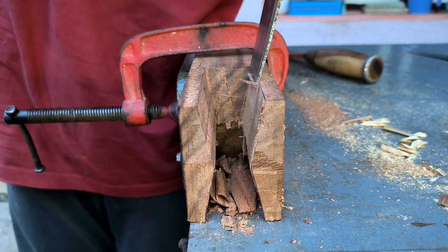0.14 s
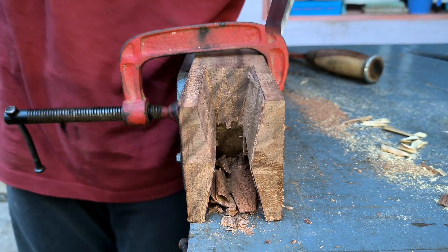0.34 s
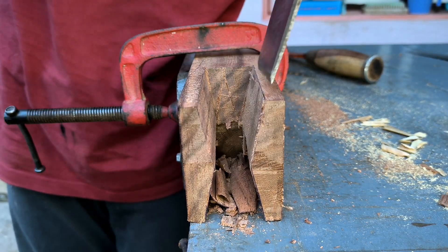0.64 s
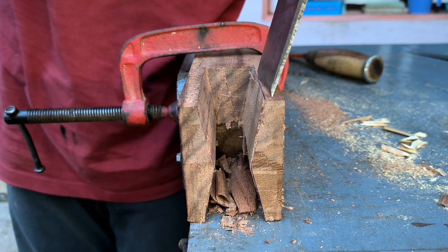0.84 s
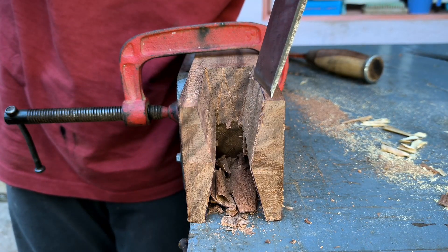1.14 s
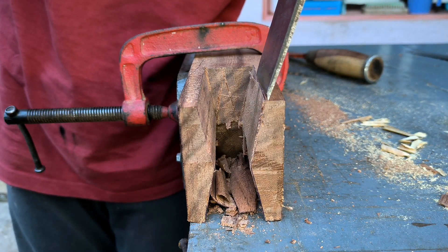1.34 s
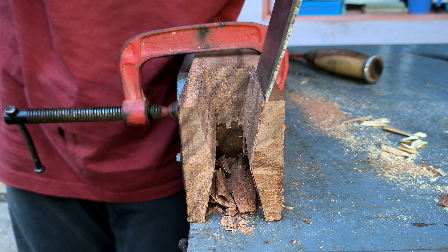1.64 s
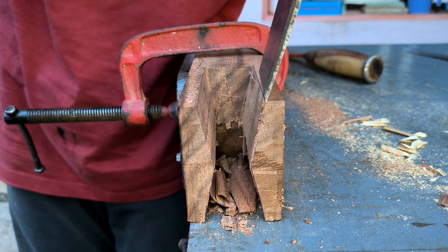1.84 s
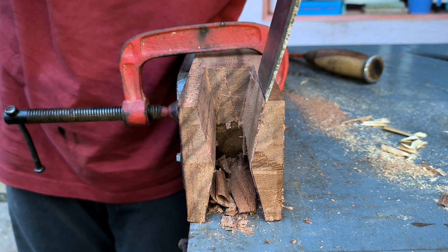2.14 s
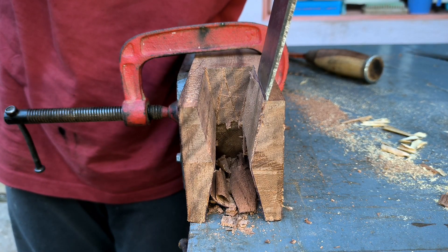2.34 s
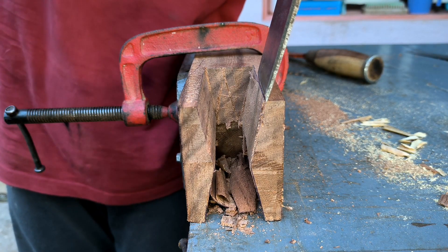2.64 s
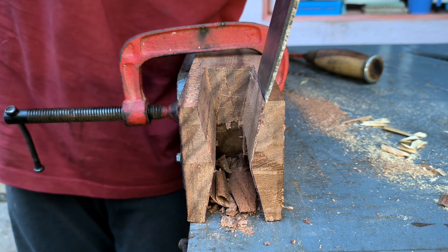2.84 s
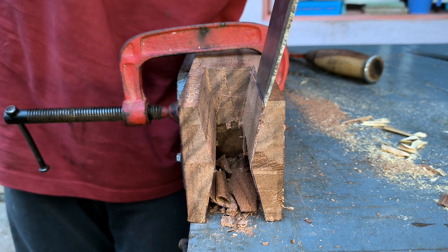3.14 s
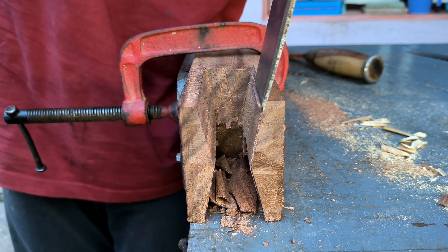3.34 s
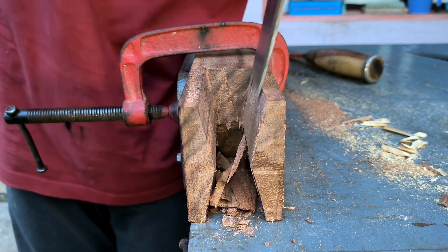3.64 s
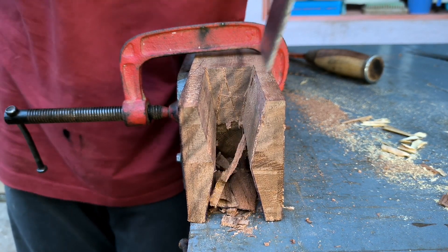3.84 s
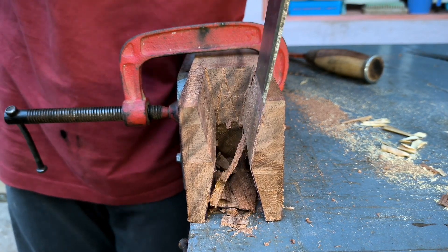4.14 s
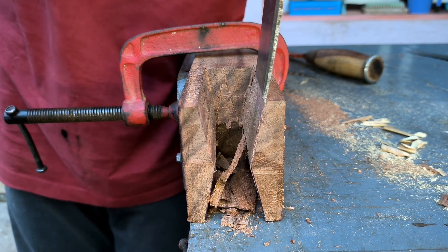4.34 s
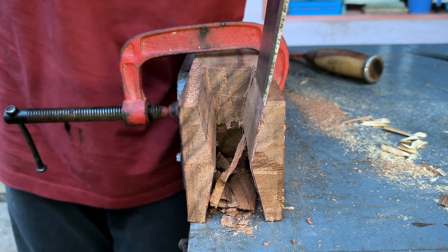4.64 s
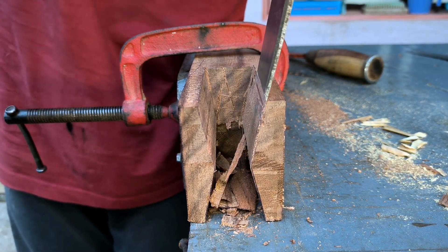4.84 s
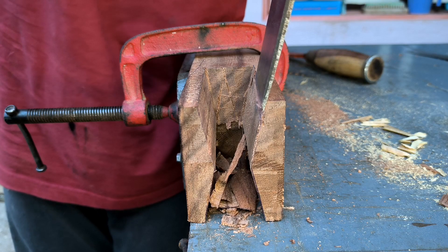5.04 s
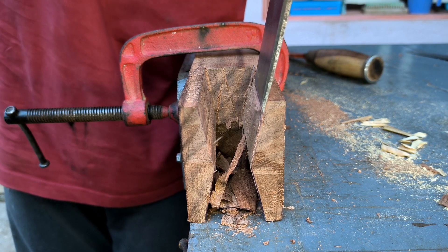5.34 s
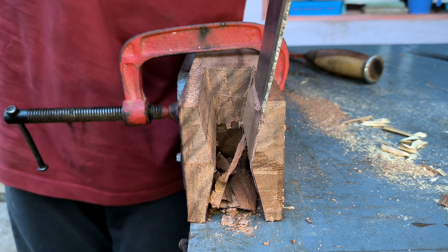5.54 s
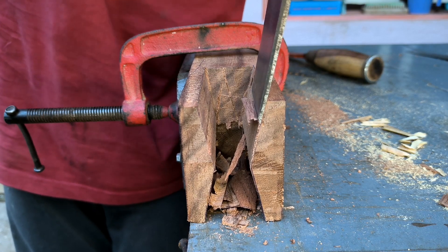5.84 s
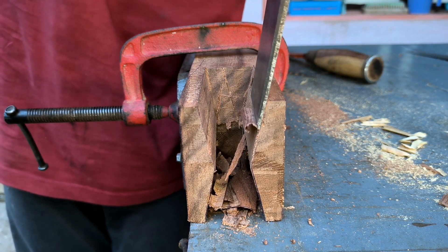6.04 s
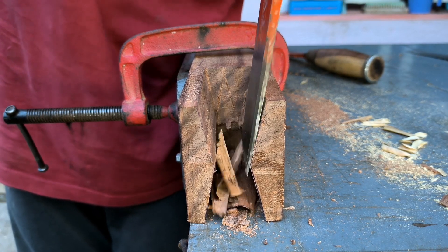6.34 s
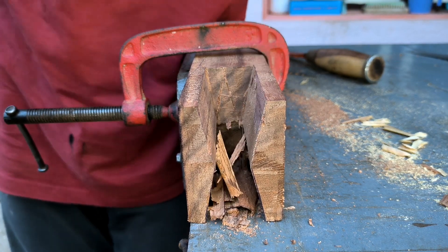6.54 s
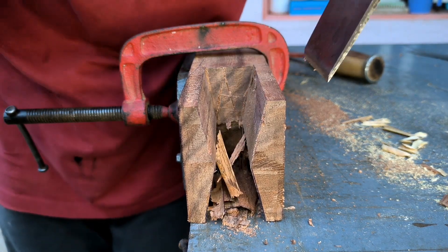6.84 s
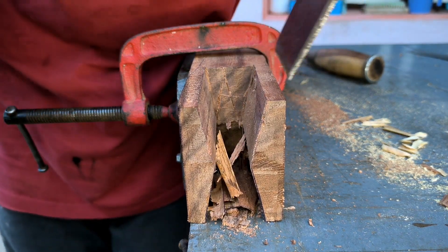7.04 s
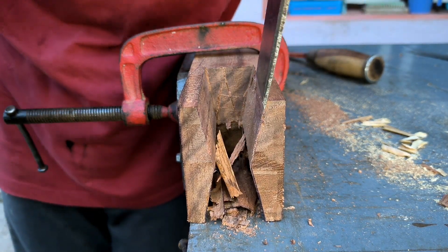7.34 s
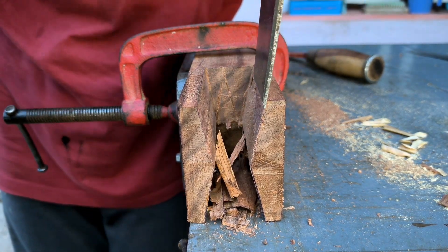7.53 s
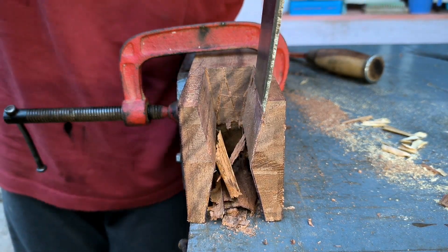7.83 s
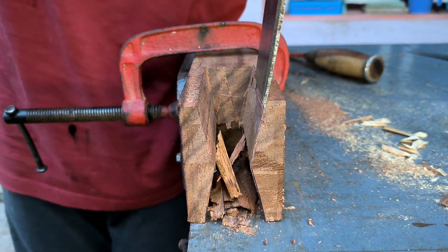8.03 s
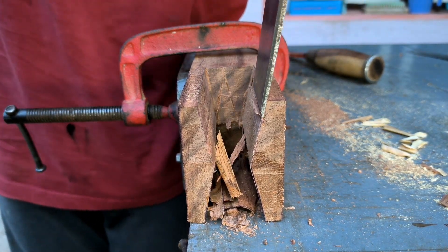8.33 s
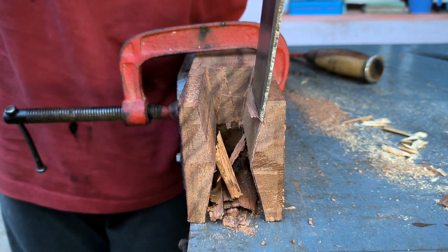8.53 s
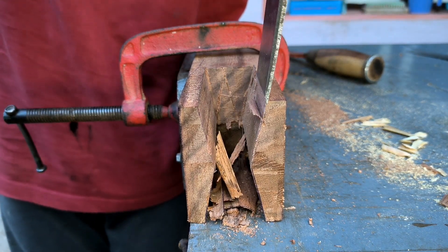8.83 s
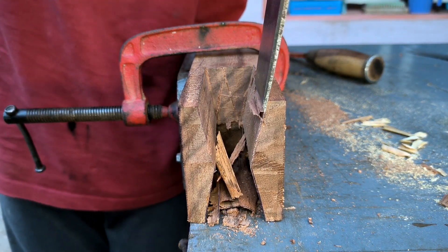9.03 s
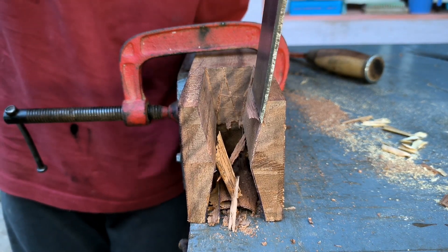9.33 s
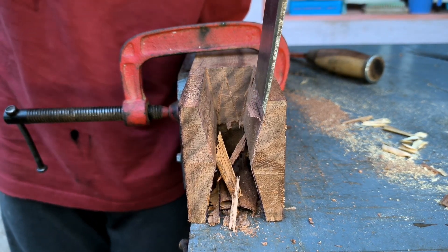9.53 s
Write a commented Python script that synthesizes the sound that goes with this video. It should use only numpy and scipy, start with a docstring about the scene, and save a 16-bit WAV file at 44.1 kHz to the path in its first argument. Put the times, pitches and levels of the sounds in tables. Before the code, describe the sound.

A chisel scrapes softly into wood with a grainy hiss and small dry snaps during the first second, then shifts faintly, with another scrape at about 2 seconds. From 2.8 to 3.6 seconds a mallet strikes it four times in short, dry knocks. Each blow carries a crack of fibres, a dull workbench thud and the rattle and ring of a clamp's loose steel bar. A lighter tap comes at 4 seconds and two firm knocks at 4.5 and 4.8, then the blade groans briefly against the wood around 5. Five even knocks follow from 5.4 to 6.3 seconds. A splinter snaps at 6.5, and a lull holds a light tap and faint ticks. Five more knocks fall between 7.9 and 9.2 seconds, mixed with scraping and splintering. Everything sounds close, with quick reflections over quiet, steady air.

```python
"""A chisel scrapes and snaps through wood, then a mallet drives it in with runs of short, dry knocks.
Under each blow the fibres crack, the workbench thuds, and the loose steel bar of the clamp that holds
the block rattles and rings. Between blows the blade pares with a grainy hiss, prises splinters free
and now and then groans against the wall of the cut. Quick reflections and quiet air surround the work."""
import sys
import numpy as np
from scipy import signal
from scipy.fft import rfft, irfft, next_fast_len
from scipy.io import wavfile

SR = 44100
rng = np.random.default_rng(int(sys.argv[2]) if len(sys.argv) > 2 else 0)


def dump(signal):
    """Clip the signal to [-1, 1] and save it as 16-bit WAV at the path in sys.argv[1]."""
    limited = np.clip(np.atleast_2d(signal).T, -1, 1)
    pcm = np.round(limited * 32767).astype(np.int16)
    wavfile.write(sys.argv[1], SR, pcm)


N = 426888
CUTOFF_HZ = 15900
LENGTH = SR // 3   # samples in a one-shot
AGE = np.arange(LENGTH) / SR   # seconds into a one-shot

# blows and taps on the chisel: t/s, knock/dB, brightness/(dB per octave), thud/dB, rattle/dB, rattle hold/s
BLOWS = [(0.898, -70, 29, -57.5, -69, 0.022), (2.8483, -27, -4, -33, -39.5, 0.059),
         (3.1057, -27.5, -3.5, -31.5, -39, 0.059), (3.3387, -27.5, 2.5, -35, -39, 0.063),
         (3.561, -29.5, 4.5, -35, -39, 0.05), (4.0495, -41.5, -7, -42, -46, 0.039),
         (4.5346, -28, 3.5, -42, -39.5, 0.04), (4.7805, -27.5, 4, -39, -39.5, 0.038),
         (5.1524, -54, 10, -41.5, -51, 0.029), (5.266, -78, 30, -66, -72, 0.0091),
         (5.4428, -31, 1, -34.5, -36.5, .055), (5.6835, -27, 0.5, -38, -42, 0.056),
         (5.9093, -27.5, 2.5, -38, -40, 0.034), (6.1254, -29, 8.5, -35.5, -46, 0.054),
         (6.3416, -28, 7, -35, -39.5, 0.052), (6.535, -53.5, 21, -63, -55, 0.017),
         (7.281, -48.5, -8, -50, -61.5, 0.0055), (7.416, -81, 2, -65.5, -91, 0.016),
         (7.918, -32.5, 3.5, -39.5, -44, 0.037), (8.2775, -72.5, 3, -42, -54.5, 0.026),
         (8.3311, -28.5, -10.5, -38.5, -42, 0.033), (8.5559, -26.5, 7, -35, -40.5, 0.045),
         (8.9762, -28, -0.5, -37.5, -39.5, 0.049), (9.1891, -29, -3.5, -34.5, -33.5, 0.038)]
# hard landings of the loose bar: t/s, level/dB
CLINKS = [(2.8983, -41), (2.932, -49.5), (3.1582, -42.5), (3.383, -38), (4.0627, -40), (4.088, -44),
          (4.564, -42.5), (5.176, -46), (5.735, -38.5), (6.1651, -37), (6.394, -49), (7.938, -44.5),
          (7.9629, -39.5), (8.375, -42.5), (8.993, -38), (9.0181, -42)]
# modes of the block and bench top: f/Hz, level/dB, t60/s, left over right/dB
BENCH_MODES = [(150.1, -20, 0.17, -4), (219, -8, .11, -1), (261.3, -3, 0.083, -4.5), (316, 2.5, 0.084, 0.5),
               (381.7, -5, 0.15, 0), (405, -2.5, 0.066, -6.5), (526, 4.5, 0.059, -10.5),
               (547, 0, 0.14, -4.5), (635.5, -3.5, 0.055, 0.5), (780, -10.5, 0.017, 0.5)]
# modes of the clamp's steel, and the bar's shrill ring: f/Hz, level/dB, t60/s, left over right/dB
STEEL_MODES = [(1243, -8, .08, -1), (1650, -3, .04, 3), (5160, -20, .018, -3), (6405, -18, .05, 0),
               (8315, -2, .035, -3), (8698, -15, .03, -7), (9898, -23, .05, -3), (10665, -20, .04, -4)]
SHRILL_MODES = [(13435, 0, .05, 2), (13520, -6, .018, 0), (13095, -14, .025, 0), (15330, -14, .018, -2)]
# tone of cracking fibres, the rattling bar and the hissing blade: f/Hz, level/dB
CRACK_EQ = [(20, -12), (100, -19.5), (300, 4), (900, 7), (2500, 8), (3500, 0), (6000, -8), (8500, -5),
            (12000, -10.5), (14000, -1), (15500, -1), (16500, -2.5)]
RATTLE_EQ = [(100, -22), (230, 7.5), (600, 8), (850, 1.5), (1600, 9.5), (2500, -1), (3400, -6.5), (5300, 1),
             (7300, -14), (8600, 5), (12000, -10.5), (13500, 5), (15400, -2.5), (16200, -24.5)]
HISS_EQ = [(1200, -24), (3000, -3), (4500, -4.5), (7000, -3.5), (10500, -4), (12000, -1), (13600, 2),
           (15300, 4), (16000, -20.5)]


def blows(tick_lead_s=0.0125, tick_db=-28, crack_db=-6):
    """Each blow layers a knock, a faint tick just ahead of it, a crack, a thud and the clamp's rattle."""
    out = np.zeros((2, N))
    for s, knock_db, bright_db, thud_db, rattle_db, hold_s in BLOWS:
        add(out, s, amp(knock_db) * knock(bright_db))
        add(out, s - tick_lead_s, amp(knock_db + tick_db) * knock(bright_db))
        add(out, s, amp(knock_db + crack_db) * fibre_crack())
        add(out, s, amp(thud_db) * bench_thud())
        add(out, s, amp(rattle_db) * clamp_rattle(s, hold_s, rattle_db))
    return out


def knock(bright_db, rebound=0.99, rebound_s=0.001867, contact_s=0.00056):
    """The mallet meets the handle; the chisel springs back against it an instant later."""
    # mallet and chisel handle: f/Hz, level/dB, t60/s, left over right/dB
    handle_modes = [(657.5, -11.5, 0.035, 1), (1175, -6.5, 0.036, 0.5), (1504, -3, 0.024, 7.5),
                    (1684, -0.5, 0.013, 1), (2121, 2.5, 0.013, -3), (2354, -6.5, 0.016, 0.5),
                    (2880, -14.5, 0.02, 0), (3770, -34, 0.0017, -8)]
    first = struck(handle_modes, detune=0.054, scatter_db=0, phase_spread=0.95, tilt_db=bright_db)
    again = struck(handle_modes, detune=0.025, scatter_db=2.5, phase_spread=0.32, tilt_db=bright_db)
    attack = 1 - np.exp(-AGE / contact_s)
    lag = int(rebound_s * rng.uniform(0.8, 1.211) * SR)
    return burst_one(first * attack + rebound * delayed(again * attack, lag))


def fibre_crack(bite_s=0.0017, decay_s=0.0035):
    """The edge bites and the fibres part in one short burst of noise."""
    attack = 1 - np.exp(-(AGE / bite_s) ** 2)
    return burst_one(colour(noise_burst(decay_s) * attack, CRACK_EQ))


def bench_thud(thump_db=-4.5, thump_s=0.014, give_s=0.0016):
    """The block is driven into the bench top: a dull thump and a few low modes."""
    # tone of the thump: f/Hz, level/dB
    thump_eq = [(20, -24), (100, -17.5), (180, -3.5), (230, 7), (320, 5), (600, -1), (1000, 4.5),
                (2500, -28)]
    attack = 1 - np.exp(-AGE / give_s)
    body = struck(BENCH_MODES, detune=0.018, scatter_db=1.5, phase_spread=0.13) * attack
    thump = colour(pan(-2.5) * rng.standard_normal(LENGTH) * np.exp(-AGE / thump_s), thump_eq)
    return burst_one(burst_one(body) + amp(thump_db) * burst_one(thump))


def clamp_rattle(start_s, hold_s, rattle_db, rough_db=2.5, ring_db=-1, wake_db=-38.5, bloom_s=0.035):
    """The bar's chatter is heard as a rough buzz and sets the steel ringing."""
    buzz = chatter(start_s, hold_s)
    rough = pan(-1.2) * burst_one(uneven_colour(colour(buzz, RATTLE_EQ)))
    ringing = steel(buzz, STEEL_MODES)
    # the shrill ring blooms late, and only a hard rattle wakes it fully
    bloom = 1 - np.exp(-(AGE / bloom_s) ** 2)
    shrill = steel(buzz * bloom, SHRILL_MODES)
    shrill_db = 0.5 + 0.39 * min(rattle_db - wake_db, 0)
    return amp(rough_db) * rough + amp(ring_db) * ringing + amp(shrill_db) * shrill


def chatter(start_s, hold_s, build_s=0.019, settle_s=0.0097, airborne_db=-5.5):
    """The loose bar is shaken up, buzzes against the screw and settles; it is quieter while airborne."""
    shake = np.interp(AGE, [0, build_s], [0.52, 1]) * np.exp(-np.maximum(AGE - hold_s, 0) / settle_s)
    landing_s, landing_db = np.transpose(CLINKS)[:, :, None]
    flight_s = 0.012 * amp(landing_db + 39)   # the harder the landing, the longer the flight before it
    to_landing = landing_s - start_s - AGE
    airborne = ((to_landing > 0) & (to_landing < flight_s)).any(axis=0)
    buzz = grains(LENGTH, per_s=540, spread_db=1, decay_s=0.002)
    return shake * amp(airborne_db * airborne) * speckle(buzz, spread_db=3.5, per_s=80, bands=22)


def steel(drive, modes, scatter_db=12.5):
    """Contacts ring the steel's modes, each with a share that changes from blow to blow."""
    shares = amp(scatter_db * rng.standard_normal(len(modes)))
    return burst_one(sum(share * amp(db) * pan(side_db) * rms_one(ring(drive, hz, t60))
                         for share, (hz, db, t60, side_db) in zip(shares, modes)))


def uneven_colour(x, depth=0.65, delay_s=0.0007):
    """Two short random delays give each rattle of the bar its own uneven, metallic colour."""
    for stretch in (1, np.e):
        lag = int(rng.uniform(0.5, 1.5) * stretch * delay_s * SR)
        x = x + depth * delayed(x, lag)
    return x


def clinks(click_db=-3, ring_db=-7.5, shrill_db=-1):
    """The bar lands hard: a bright click and the steel's ring."""
    out = np.zeros((2, N))
    for s, db in CLINKS:
        click = noise_burst(decay_s=0.0024)
        ringing = amp(ring_db) * steel(click, STEEL_MODES) + amp(shrill_db) * steel(click, SHRILL_MODES)
        add(out, s, amp(db) * (amp(click_db) * burst_one(colour(click, RATTLE_EQ)) + ringing))
    return out


def paring(hiss_db=-2, smoothness=1.2):
    """Fibres part under the edge as dense grains over a smooth sliding hiss."""
    # tone of the woody rasp: f/Hz, level/dB
    rasp_eq = [(40, -33.5), (120, -15), (300, -7.5), (650, 1.5), (1000, -6), (1600, -1), (2600, -0.5),
               (4500, -6), (9000, -22)]
    hiss_gain, rasp_gain = blade_pressure()
    fibres = rms_one(grains(N, per_s=440, spread_db=2, decay_s=0.0013))
    scrape = speckle(fibres + smoothness * stereo_noise(N), spread_db=3, per_s=45, bands=26)
    hiss = amp(hiss_db) * hiss_gain * pan(-1.5) * rms_one(colour(scrape, HISS_EQ))
    rasp = rasp_gain * rms_one(colour(scrape, rasp_eq))
    return hiss + rasp


def blade_pressure(attack_s=0.016, release_s=0.043, slide_db=-18, slide_rasp_db=-5.5):
    """Envelopes of hiss and rasp: pushes by hand, a dying slide after each blow, a light touch between."""
    # pushes of the blade through the fibres: t/s, level/dB, hold/s, rasp offset/dB
    pushes = [(0.082, -42, 0.018, -5), (0.217, -54.5, .03, -13), (0.35, -62.5, .14, -11),
              (0.513, -55.5, .28, -6), (0.57, -52, .01, -0.5), (0.616, -43.5, .02, -17),
              (0.822, -45, .005, -8), (0.902, -52.5, .025, -8.5), (0.957, -65.5, .24, -6.5),
              (1.224, -61.5, .015, -8), (2.022, -48.5, 0.037, -8.5), (2.096, -58.5, .09, -4.5),
              (2.723, -43, .01, -4.5), (3.236, -54.5, .07, -15.5), (3.45, -50, .03, -7),
              (3.633, -52.5, .01, -4.5), (3.709, -56, .07, -8), (4.476, -60, .04, -3),
              (4.629, -51.5, .005, -10), (4.728, -54, .02, -14), (4.873, -49, .06, -7),
              (5.01, -52, 0.12, -12), (5.312, -60, .08, -19.5), (5.772, -49, .005, -8.5),
              (5.975, -55.5, .02, -4.5), (6.082, -54, .03, 2), (6.261, -56.5, .005, -5),
              (6.463, -56, .08, -2), (6.706, -61.5, .02, -22), (7.668, -65.5, .005, -18),
              (8.182, -70.5, .02, -9), (8.256, -57, .04, -1), (8.7, -52, .03, -2),
              (8.762, -52.5, 0.0048, -25), (8.801, -49, .01, -10), (8.853, -59, 0.023, -16),
              (9.263, -52.5, .025, -18), (9.52, -63.5, .012, -5)]
    slides = [(s, knock_db + slide_db, 0, slide_rasp_db) for s, knock_db, *_ in BLOWS]
    power = amp([[-75], [-78]]) ** 2 * np.ones(N)   # hiss and rasp of the lightly shifting blade
    age = np.arange(SR) / SR
    attack = np.minimum(age / attack_s, 1) ** 2
    for s, db, hold_s, rasp_db in [*pushes, *slides]:
        release = np.exp(-np.maximum(age - attack_s - hold_s, 0) / release_s)
        add(power, s, (amp([[db], [db + rasp_db]]) * attack * release) ** 2)
    return np.sqrt(power)


def splinters(snap_s=0.003, crack_s=0.0015, crack_db=-8.5, body_db=-4.5):
    """A splinter lets go with a dry snap and a little woody knock that sets the block ringing."""
    # splinters cracking and shifting: t/s, snap/dB, woody knock/dB
    breaks = [(.099, -51.5, -58), (.129, -53, -56.5), (.586, -52, -72), (.6345, -55.5, -74),
              (.846, -50.5, -67), (1.245, -68.5, -94), (2.738, -62, -76), (3.2486, -64.5, -79),
              (3.785, -76, -78.5), (4.02, -72.5, -87), (4.948, -61.5, -73), (6.552, -51, -54.5),
              (6.9, -78.5, -91), (7.02, -73, -89.5), (7.288, -67, -58), (7.48, -78, -90.5),
              (7.633, -75, -70.5), (8.303, -66, -51), (8.745, -58, -56.5), (8.7785, -64, -86),
              (8.83, -65, -65), (9.555, -70.5, -71)]
    out = np.zeros((2, N))
    attack = 1 - np.exp(-AGE / snap_s)
    for s, snap_db, woody_db in breaks:
        snap = colour(noise_burst(snap_s), HISS_EQ)
        crack = colour(noise_burst(crack_s), CRACK_EQ)
        body = struck(BENCH_MODES, detune=0.035, scatter_db=5, phase_spread=0.2) * attack
        add(out, s, amp(snap_db) * (burst_one(snap) + amp(crack_db) * burst_one(crack)))
        add(out, s, amp(woody_db) * (knock(bright_db=0) + amp(body_db) * burst_one(body)))
    return out


def groans():
    """The blade sticks and slips on the wall of the cut, which hums briefly."""
    # rubs of the blade: peak t/s, level/dB, rise and fall time/s
    rubs = [(.13, -64, 0.014), (2.126, -85, 0.017), (2.189, -60, .015), (4.397, -62, 0.016),
            (4.484, -59, 0.02), (4.898, -68, 0.013), (4.953, -45.5, 0.012), (5.037, -55.5, 0.033),
            (5.109, -57, 0.075), (8.304, -47, 0.0026), (8.747, -57.5, 0.023)]
    # wall of the cut, damped by the blade: f/Hz, level/dB, t60/s
    wall_modes = [(615, -6, .03), (680, 0, .065), (1220, -14, .025), (1580, -10, .02)]
    out = np.zeros((2, N))
    for s, db, fade_s in rubs:
        swell = np.exp(-np.abs(AGE - AGE.mean()) / fade_s)
        slips = swell * grains(LENGTH, per_s=700, spread_db=2, decay_s=0.0012)
        jerks = np.gradient(slips, axis=-1)
        hum = sum(amp(mode_db) * rms_one(ring(jerks, hz, t60)) for hz, mode_db, t60 in wall_modes)
        add(out, s - AGE.mean(), amp(db) * burst_one(hum))
    return out


def reflections(x, early_db=-17.5, early_t60=0.1, tail_db=-20, tail_t60=0.28, build_s=0.003):
    """Quick reflections off the bench top, then a faint workshop tail."""
    # tone of the reflections: f/Hz, level/dB
    room_eq = [(100, -5.5), (400, 3), (2000, -5), (6000, 5.5), (15000, -17.5)]
    build = 1 - np.exp(-(AGE / build_s) ** 2)
    response = 0
    for db, t60 in ((early_db, early_t60), (tail_db, tail_t60)):
        echoes = colour(stereo_noise(LENGTH), room_eq) * build * np.exp(-np.log(1000) * AGE / t60)
        response = response + amp(db) * rms_one(echoes) / np.sqrt(LENGTH)
    return signal.oaconvolve(x, response, axes=-1)[:, :N]


def room_air(level_db=-69):
    """A steady, low bed of room tone."""
    # tone of the quiet air: f/Hz, level/dB
    air_eq = [(18, -77), (30, -56.5), (70, -24.5), (165, -3.5), (280, -9), (600, -14), (649, -14),
              (801, -19.5), (1160, -26), (1350, -23.5), (1860, -38.5), (3490, -29), (12300, -30),
              (14800, -24.5), (16000, -38)]
    return amp(level_db) * rms_one(colour(stereo_noise(N), air_eq))


def struck(modes, detune, scatter_db, phase_spread, tilt_db=0):
    """Modes set ringing by one blow, each a little different every time and at each ear."""
    out = 0
    pivot_hz = modes[3][0]
    for k, (hz, db, t60, side_db) in enumerate(modes):
        pitch, strength, skew = rng.standard_normal(3)
        phase = 2 * np.pi * hz * (1 + detune * pitch) * AGE + phase_spread * skew * np.array([[1], [-1]])
        level_db = db + scatter_db * strength + tilt_db * np.clip(np.log2(hz / pivot_hz), -1, 1)
        decay = np.exp(-np.log(1000) * AGE / t60)
        out = out + (-1) ** k * pan(side_db) * amp(level_db) * np.sin(phase) * decay
    return out


def ring(drive, hz, t60):
    """One damped mode, driven by a signal."""
    radius, angle = amp(-60 / (t60 * SR)), 2 * np.pi * hz / SR
    return signal.lfilter([0, np.sin(angle)], [1, -2 * radius * np.cos(angle), radius ** 2], drive + 1e-18)


def grains(size, per_s, spread_db, decay_s):
    """Random contacts of uneven strength, each letting off a tiny burst of noise."""
    clicks = (rng.random(size) < per_s / SR) * amp(spread_db * np.clip(rng.standard_normal(size), -2, 2))
    power = signal.lfilter([1], [1, -np.exp(-2 / (decay_s * SR))], clicks ** 2 + 1e-18)
    return np.sqrt(power) * stereo_noise(size)


def speckle(x, spread_db, per_s, bands):
    """No two contacts sound alike: each band swells and sinks on its own."""
    size = x.shape[-1]
    padded = next_fast_len(size, True)
    band_position = np.sqrt(np.fft.rfftfreq(padded, 1 / SR) / CUTOFF_HZ).clip(0, 1) * (bands - 1)
    step_position = np.arange(size) / SR * per_s
    spectrum, out = rfft(x, padded), 0
    for k, steps in enumerate(rng.standard_normal((bands, 2000)).clip(-2, 2)):
        band = irfft(spectrum * np.maximum(1 - np.abs(band_position - k), 0), padded)[:, :size]
        out = out + band * amp(spread_db * np.interp(step_position, np.arange(len(steps)), steps))
    return out


def noise_burst(decay_s):
    """White noise that starts at once and dies away."""
    return stereo_noise(LENGTH) * np.exp(-AGE / decay_s)


def stereo_noise(size):
    """White noise, narrow in the bass and wide in the treble."""
    # likeness of the two ears: f/Hz, correlation
    likeness = [(100, 0.6), (600, 0.73), (1500, 0), (3000, 0), (5000, 0), (9000, 0.2), (15000, 0)]
    padded = next_fast_len(size, True)
    mid, side = rfft(rng.standard_normal((2, padded)))
    alike = np.clip(at_hz(likeness, np.fft.rfftfreq(padded, 1 / SR)), -0.99, 0.99)
    spectrum = np.sqrt(1 + alike) * mid + np.sqrt(1 - alike) * side * [[1], [-1]]
    return rms_one(irfft(spectrum, padded)[:, :size])


def colour(x, eq, size=2048):
    """Minimum-phase EQ, so nothing rings ahead of a transient."""
    cepstrum = irfft(np.log(amp(at_hz(eq, np.fft.rfftfreq(size, 1 / SR)))))
    cepstrum[1:size // 2] *= 2
    cepstrum[size // 2 + 1:] = 0
    response = irfft(np.exp(rfft(cepstrum)))
    return signal.oaconvolve(x, response[None], axes=-1)[:, :x.shape[-1]]


def at_hz(points, hz):
    """Read a curve on a log-frequency axis."""
    f, value = np.transpose(points)
    return np.interp(np.log(hz + 0.0008), np.log(f), value)


def amp(db):
    """Decibels to gain."""
    return 10 ** (np.asarray(db) / 20)


def rms_one(x):
    """Scale to rms 1."""
    return x / np.sqrt(np.mean(x ** 2) + 1e-20)


def burst_one(x):
    """Scale a burst to the energy of 50 ms at rms 1."""
    return rms_one(x) * np.sqrt(SR / 20 / x.shape[-1])


def pan(db):
    """Constant-power gains, left louder than right by db."""
    return rms_one(amp([[db / 2], [-db / 2]]))


def delayed(x, lag):
    """Delay a one-shot by lag samples."""
    return np.pad(x, ((0, 0), (lag, 0)))[:, :LENGTH]


def add(out, s, x):
    """Mix a sound in at time s."""
    i = max(round(s * SR), 0)
    out[:, i:i + x.shape[-1]] += x[..., :N - i]


def scene():
    """The work at the bench, its reflections and the quiet air around it."""
    work = blows() + clinks() + groans() + paring() + splinters()
    return work + reflections(work) + room_air()


def record(dry):
    """Soft clipping rounds the highest peaks and a steep low-pass cuts the top."""
    ceiling = 0.75
    lowpass = signal.ellip(10, 0.2, 80, CUTOFF_HZ, fs=SR, output="sos")
    return signal.sosfilt(lowpass, ceiling * np.tanh(dry / ceiling))


dry = scene()
out = record(dry)
dump(out)
```